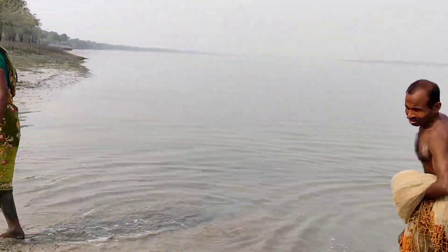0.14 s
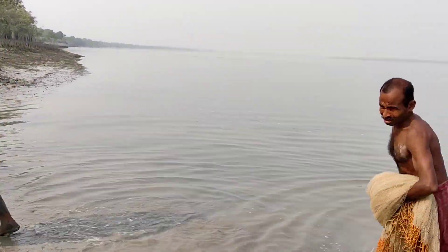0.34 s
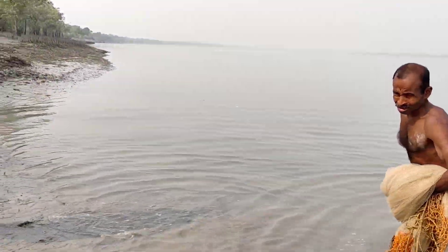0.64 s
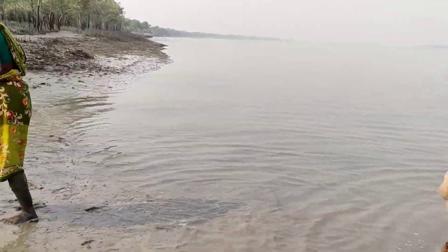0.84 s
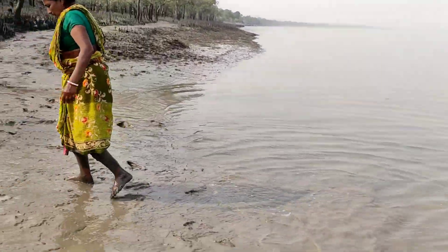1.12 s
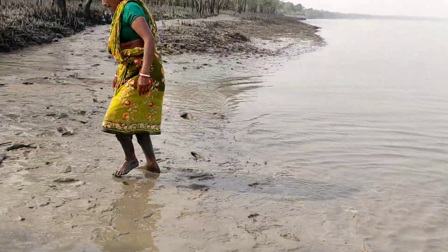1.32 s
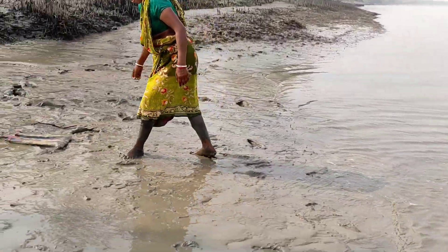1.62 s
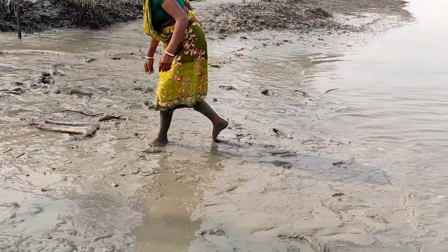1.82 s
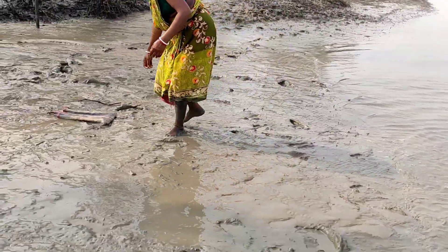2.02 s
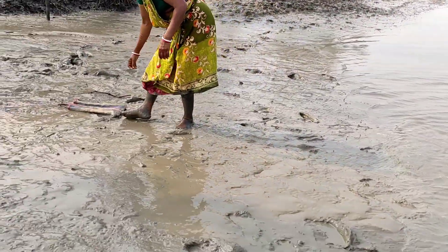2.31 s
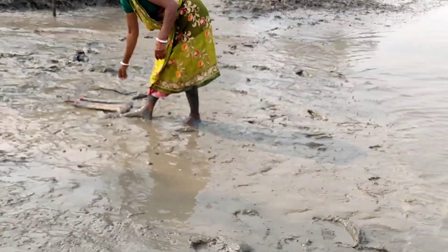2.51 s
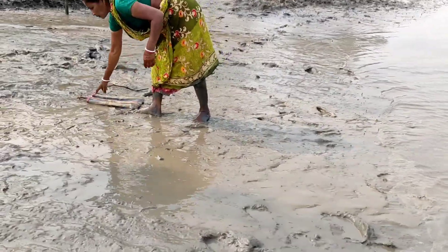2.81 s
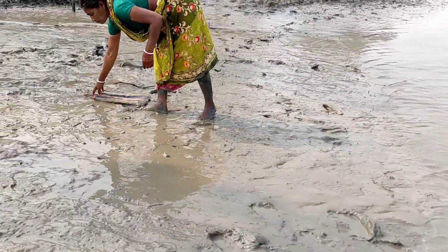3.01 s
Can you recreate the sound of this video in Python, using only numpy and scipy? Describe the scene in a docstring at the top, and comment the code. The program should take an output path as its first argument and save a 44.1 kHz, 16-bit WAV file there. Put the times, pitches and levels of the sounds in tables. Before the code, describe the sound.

Wet barefoot steps slosh out of shallow water into mud, with small plops and a smack.

```python
"""Bare feet wade through shallow water, a few metres left of two microphones on a quiet open shore.
Each push or pull of a foot stirs a low gurgle, a slosh of small bubbles and a fizz of wet mud,
while larger air pockets plop and thin mud films snap. At about 0.8 s a sole lands with one wet
smack, and the slosh turns duller as the feet leave the water for soft mud. The squelching goes on,
with the sharpest snap near 2.2 s and the loudest plop near 2.8 s."""
import sys
import numpy as np
from scipy import signal
from scipy.fft import rfft, irfft
from scipy.io import wavfile
from scipy.ndimage import map_coordinates

SR = 44100
rng = np.random.default_rng(int(sys.argv[2]) if len(sys.argv) > 2 else 0)


def inscribe(sig):
    """Save sig as 16-bit PCM at rate SR to the path in sys.argv[1].

    A 1-D sig is mono; a 2-D sig holds one channel per row.
    Samples are clipped to [-1, 1] before scaling.
    """
    pcm = np.round(np.clip(np.atleast_2d(sig).T, -1, 1) * 32767)
    wavfile.write(sys.argv[1], SR, pcm.astype(np.int16))


N = 138915


def squelches():
    """Each foot movement stirs three swarms of bubbles that swell and fade: gurgle, slosh and fizz."""
    # foot movements: (strongest at [s], rise [s], fall [s], gurgle [dB], slosh [dB], fizz [dB])
    movements = [(0.038, 0.09, 0.036, -53, -44, -49), (0.262, 0.15, 0.14, -48, -45.5, -48),
                 (0.468, 0.037, 0.036, -53, -49.5, -44.5), (0.55, 0.21, 0.2, -55, -46, -58),
                 (0.73, 0.055, 0.068, -51.5, -52.5, -51.5), (0.88, 0.071, 0.078, -42, -46, -51),
                 (1.006, 0.038, 0.026, -46, -45, -44), (1.063, 0.023, 0.13, -55, -45.5, -52.5),
                 (1.21, 0.015, 0.071, -54.5, -51, -54), (1.362, 0.062, 0.03, -41.5, -46, -57),
                 (1.46, 0.064, 0.043, -52, -47.5, -49.5), (1.596, 0.12, 0.054, -41, -45, -47.5),
                 (1.7, 0.1, 0.065, -58, -47, -46.5), (1.932, 0.21, 0.21, -55.5, -50.5, -51.5),
                 (2.1, 0.04, 0.042, -50.5, -45.5, -43.5), (2.191, 0.089, 0.09, -59, -48, -42),
                 (2.241, 0.073, 0.067, -51, -43, -45.5), (2.34, 0.054, 0.058, -68.5, -50, -51.5),
                 (2.429, 0.027, 0.022, -73, -47, -47), (2.762, 0.23, 0.07, -56.5, -56, -53),
                 (2.89, 0.09, 0.11, -51, -44, -44.5), (2.988, 0.043, 0.03, -45, -46.5, -42),
                 (3.078, 0.078, 0.092, -54, -45.5, -43.5)]
    t, powers = np.arange(N) / SR, np.zeros((3, N))
    for at, rise, fall, *levels_db in movements:
        width = np.where(t < at, rise, fall)
        swell = np.exp(-abs((t - at) / width) ** 3.3)  # a flat top with steep sides
        powers += (amp(levels_db)[:, None] * swell) ** 2
    swarms = gurgle(), slosh(), fizz()
    return sum(np.sqrt(power) * unit_level(swarm) for power, swarm in zip(powers, swarms))


def gurgle():
    """The biggest bubbles in the stirred mud ring lowest."""
    # tone of the gurgle: (frequency [Hz], level [dB])
    tone = [(60, -45), (170, -23.5), (270, -3.5), (400, 2), (520, -4.5), (700, -25), (1500, -45)]
    return colour(bubble_swarm(177, 628, per_s=700, cycles=2.6, spread_db=-0.5, glide=0.014), tone)


def slosh():
    """Small bubbles sound bright in water and duller once the feet are in mud."""
    # tone of the slosh: (frequency [Hz], level [dB])
    tone = [(300, -23), (580, -13), (900, -0.5), (1500, -4.5), (2200, -7), (3500, -18)]
    ashore_s, blend_s, dull_hz = 0.8, 0.084, 1840
    bubbles = bubble_swarm(551, 3033, per_s=900, cycles=4.78, spread_db=1, glide=0.018)
    in_water = unit_level(colour(bubbles, tone))
    treble_cut = signal.butter(2, dull_hz, fs=SR, output="sos")
    in_mud = unit_level(signal.sosfilt(treble_cut, in_water))
    ashore = .5 + .5 * np.tanh((np.arange(N) / SR - ashore_s) / blend_s)
    return (1 - ashore) * in_water + ashore * in_mud


def fizz():
    """The tiniest bubbles in wet mud blur into a fizz, with sparser wet ticks among them."""
    # tone of the fizz: (frequency [Hz], level [dB])
    tone = [(700, -41), (1800, -7.5), (2500, -4), (4200, -1.5), (7300, -4), (8500, -2), (11300, -6.5),
            (12100, -6), (15500, -12.5)]
    ticks = bubble_swarm(1830, 12800, per_s=450, cycles=1.35, spread_db=2, glide=0.011)
    bubbles = bubble_swarm(1443, 15440, per_s=6000, cycles=7.2, spread_db=1.5, glide=0.012)
    return colour(bubbles + amp(-6.5) * ticks, tone)


def bubble_swarm(lo_hz, hi_hz, per_s, cycles, spread_db, glide, sizes=24, bunch_hz=16, bunch_db=6):
    """Each bubble rings and rises in pitch as it dies; bubbles of like size burst in bunches."""
    out = np.zeros(N)
    bunches = np.tanh(wobble(sizes, N, bunch_hz))
    for hz, bunch in zip(np.geomspace(lo_hz, hi_hz, sizes), bunches):
        age = np.arange(int(6 * cycles * SR / hz) + 2) * hz / SR / cycles  # counted in fade times
        shape = (1 - np.exp(-4 * age)) * np.exp(-age)
        bubble = shape * np.sin(2 * np.pi * cycles * age * (1 + glide * age))
        gap, loudness, coin = rng.exponential(size=(3, 2000))
        starts = (np.cumsum(gap) * sizes / per_s * SR).astype(int)
        flip = np.sign(coin - np.log(2))  # half the waves start downward
        strength = flip * amp(spread_db * np.minimum(loudness, 4))
        bursts = np.bincount(starts[starts < N], strength[starts < N], N) * amp(bunch_db * bunch)
        out += np.sqrt(hz / lo_hz) * signal.oaconvolve(bursts, bubble)[:N]
    return unit_level(out)


def plops(rise_cycles=2.63, roughness=0.15, glide_s=0.038):
    """Bursting air pockets ring briefly and unevenly, sliding in pitch as the mud moves."""
    # air pockets: (time [s], level [dB], pitch [Hz], fade [s], pitch slide [octaves/s])
    pockets = [(0.026, -35, 1050, 0.008, -11), (0.05, -34, 848, 0.0091, -9.5), (0.102, -38, 380, 0.0068, 3),
               (0.152, -39.5, 398, 0.011, -14.5), (0.215, -36.5, 259, 0.0075, 8.5),
               (0.229, -31.5, 870, 0.0098, 14.5), (0.293, -30.5, 962, 0.0094, 11),
               (0.446, -40.5, 1107, 0.018, 26), (0.568, -38.5, 930, 0.009, -20),
               (0.627, -34, 880, 0.006, 12.5), (0.688, -35, 417, 0.004, 25), (0.85, -26, 340, 0.011, 15.5),
               (0.975, -29.5, 196, 0.0022, 1), (0.9905, -27.5, 822, 0.0041, 10.5),
               (1.108, -36.5, 960, 0.003, 23), (1.193, -35.5, 956, 0.0027, 12),
               (1.329, -36, 411.7, 0.025, -2.5), (1.362, -24.5, 314, 0.0022, -11),
               (1.479, -33, 373, 0.0076, -14), (1.49, -25, 260, 0.007, 3.5), (1.504, -25, 342, 0.0022, 1),
               (1.68, -30, 1077, 0.0044, 17), (2.039, -35.5, 520, 0.01, 13),
               (2.089, -32.5, 382, 0.0032, 22), (2.241, -32, 2570, 0.006, 4),
               (2.244, -37, 330, 0.024, 16.5), (2.293, -37, 586, 0.0036, 10),
               (2.828, -18, 398.5, 0.0064, -7), (2.866, -32.5, 397, 0.0058, -1),
               (2.917, -24, 368, 0.0079, 15.5), (2.95, -28.5, 430, 0.01, -15),
               (2.969, -27.5, 1030, 0.0022, 13), (3.019, -32.5, 309, 0.011, 1)]
    out, t = np.zeros(N), np.arange(SR // 8) / SR
    for at, db, hz, fade_s, glide in pockets:
        rise_s = rise_cycles / hz
        swell = np.sin(np.pi / 2 * np.minimum(t / rise_s, 1)) ** 2
        fade = np.exp(-np.maximum(t - rise_s, 0) / fade_s)
        turns = np.cumsum(hz * 2 ** (glide * np.minimum(t, glide_s))) / SR
        shiver, sway = roughness * wobble(2, len(t), hz / 2)
        ring = (1 + shiver) * np.sin(2 * np.pi * turns + sway)
        add(out, at, amp(db) * swell * fade * ring)
    return out


def smack(at_s=0.8158, rise_s=0.0014, crack_s=0.0023, spray_db=-27.5, spray_s=0.033):
    """A sole slaps wet mud: a bright crack, a faint spray after it and briefly ringing hollows."""
    # hollows rung by the slap: (pitch [Hz], level [dB], fade [s])
    hollows = [(305.6, -20, 0.0036), (920, -8, 0.0013), (6620, -26, 0.004), (7880, -21.5, 0.0031)]
    # tone of the wet crack: (frequency [Hz], level [dB])
    tone = [(2700, -6.5), (4600, 6), (7700, -9), (9500, -8.5), (13000, -5.5), (15500, -17)]
    out, t = np.zeros(N), np.arange(SR // 8) / SR
    ring = sum(amp(db) * np.exp(-t / fade_s) * np.sin(2 * np.pi * hz * t) for hz, db, fade_s in hollows)
    noise = unit_level(colour(rng.standard_normal(N), tone))[:len(t)]
    fade = np.exp(-t / crack_s) + amp(spray_db) * np.exp(-t / spray_s)
    crack = amp(-17) * fade * noise
    add(out, at_s, np.minimum(t / rise_s, 1) * (ring + crack))
    return out


def snaps(crack_s=0.0019, drop_s=0.00199, roughness=0.7):
    """Thin films of mud break with a crack and a short, rough chirp down to their pitch."""
    # mud films: (time [s], level [dB], pitch [Hz], fade [s])
    films = [(0.236, -33, 1650, .006), (0.946, -34, 4200, .0015), (1.392, -30.5, 3100, .0028),
             (1.744, -37, 3250, .007), (2.1755, -23, 5800, .0018), (2.81, -33, 9000, .002),
             (2.853, -36.5, 3000, .008), (2.984, -34.5, 3700, .006)]
    out, t = np.zeros(N), np.arange(SR // 25) / SR
    for at, db, hz, fade_s in films:
        crack = 0.52 * rng.standard_normal(len(t)) * np.exp(-t / crack_s)
        turns = np.cumsum(hz * (1 + 0.64 * np.exp(-t / drop_s))) / SR
        chirp = np.sin(2 * np.pi * turns + roughness * wobble(1, len(t), hz / 10)[0])
        add(out, at, amp(db) * (crack + chirp * np.exp(-t / fade_s)))
    return out


def place(sound, scatter_db=0, spots=7, scatter_s=0.003):
    """Sound reaches the left microphone first; rough ground scatters it differently as the feet move."""
    # the feet's path on the left: (time [s], head start at the left microphone [ms])
    path = [(.85, 0.14), (1.1, 0.26), (1.4, 0.32), (2.15, 0.3365), (3.0, 0.28)]
    # share of the sound that bounces off the mud: (frequency [Hz], level [dB])
    bounce = [(400, -24), (1400, -11), (3200, -5), (12000, -2.5)]
    n, t = np.arange(N), np.arange(SR // 12) / SR
    lead_ms = np.interp(n / SR, *np.transpose(path))
    right = map_coordinates(sound, [n - lead_ms * SR / 1000], order=5)
    pair = np.array([sound, right])
    share = np.minimum(amp(curve(bounce) + scatter_db), 1)
    scattered = 0
    for spot in range(spots):
        nearness = np.cos(np.pi / 2 * np.clip(n / N * (spots - 1) - spot, -1, 1))
        echoes = rfft(rng.standard_normal((2, len(t))) * np.exp(-t / scatter_s), N)
        scattered += rfft(pair * nearness) * echoes / abs(echoes)  # smears time, keeps the tone
    direct = rfft(pair) * np.sqrt(1 - share ** 2)
    return irfft(direct + share * scattered, N)


def shore(level_db=-54):
    """Open air and water make a faint, steady rumble and hiss."""
    # tone of the shore: (frequency [Hz], level [dB])
    tone = [(40, -24.5), (80, 3.5), (180, -2), (400, -11.5), (620, -9.5), (1100, -8), (1800, -18.5),
            (10000, -20.5), (16000, -26)]
    # how alike left and right are: (frequency [Hz], likeness [0 to 1])
    likeness = [(400, 0.88), (900, 0.059), (2000, 0.02)]
    left, other = rfft(rng.standard_normal((2, N)))
    alike = curve(likeness)
    right = alike * left + np.sqrt(1 - alike ** 2) * other
    noise = irfft(np.array([left, right]), N)
    return amp(level_db) * unit_level(colour(noise, tone))


def amp(db):
    """Turns decibels into a number to multiply by."""
    return 10 ** (np.asarray(db) / 20)


def unit_level(sound):
    """Scales a sound to an average (rms) level of 1."""
    return sound / np.sqrt(np.mean(sound ** 2) + 1e-20)


def curve(points):
    """Joins (frequency [Hz], value) points into a line across all frequencies."""
    hz, value = np.transpose(points)
    return np.interp(np.log(np.fft.rfftfreq(N, 1 / SR) + 1), np.log(hz + 1), value)


def colour(sound, tone):
    """Turns each frequency up or down by a table of (frequency [Hz], level [dB])."""
    return irfft(rfft(sound) * amp(curve(tone)), N)


def add(mix, at_s, sound):
    """Mixes a sound in at the given time."""
    part = mix[max(round(at_s * SR), 0):][:len(sound)]
    part += sound[:len(part)]


def wobble(count, size, hz):
    """Rows of smooth random motion, up to about the given rate."""
    spectrum = rfft(rng.standard_normal((count, size)))
    frequencies = np.fft.rfftfreq(size, 1 / SR)
    return unit_level(irfft(spectrum / (1 + (frequencies / hz) ** 4), size))


def scene(low_cut_hz=150):
    """The footsteps on the quiet shore."""
    low_cut = signal.butter(2, low_cut_hz, "high", fs=SR, output="sos")  # the footsteps carry no deep bass
    soft, sharp = signal.sosfilt(low_cut, [squelches() + plops(), snaps() + smack()])
    return shore() + place(soft) + place(sharp, scatter_db=-1)  # sounds on the surface scatter less


def record(dry, top_hz=15650):
    """Two slightly unlike microphones pick up the scene, and the highest treble is cut off."""
    # balance of the microphones: (frequency [Hz], left minus right [dB])
    balance = [(350, -.8), (900, 1), (5000, .8), (14000, 4.5)]
    sides_db = np.outer([1, -1], curve(balance)) / 2
    pair = irfft(rfft(dry) * amp(sides_db), N)
    treble_cut = signal.firwin(511, top_hz, window=("kaiser", 9), fs=SR)
    return signal.oaconvolve(pair, treble_cut[None], "same")


dry = scene()
out = record(dry)
inscribe(out)
```